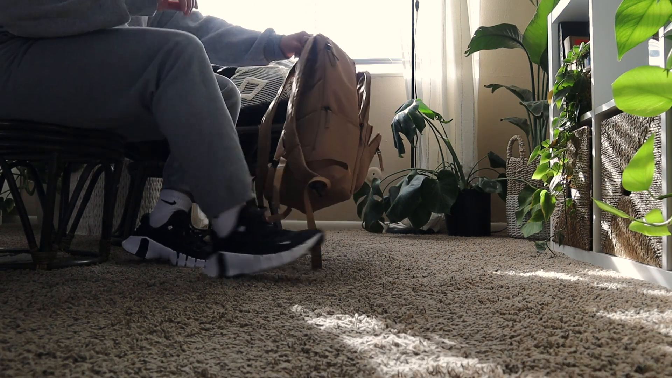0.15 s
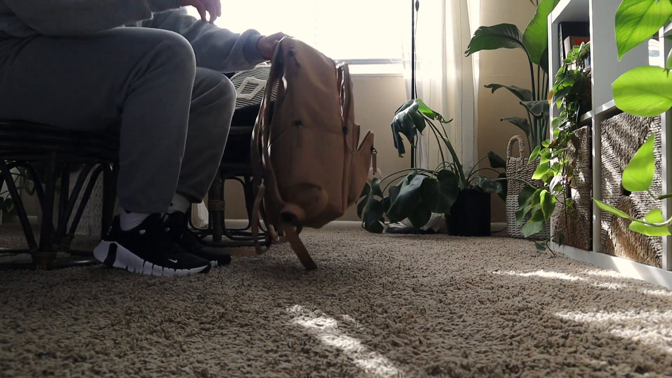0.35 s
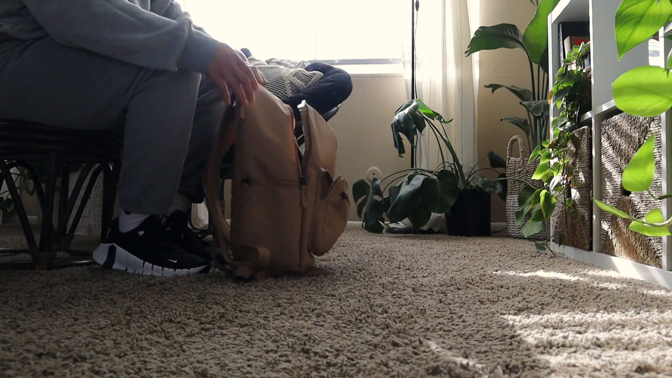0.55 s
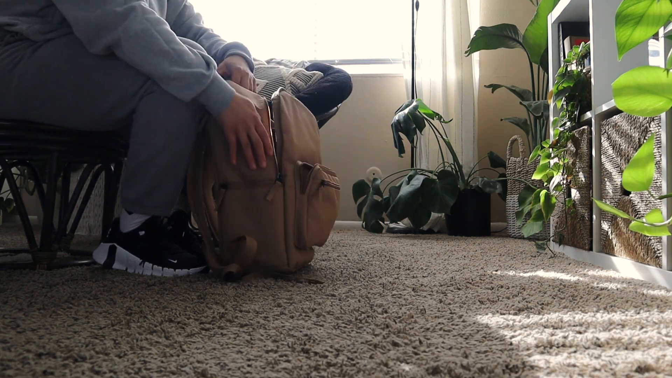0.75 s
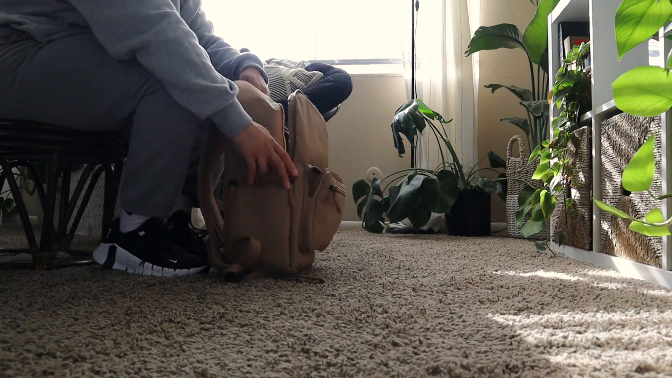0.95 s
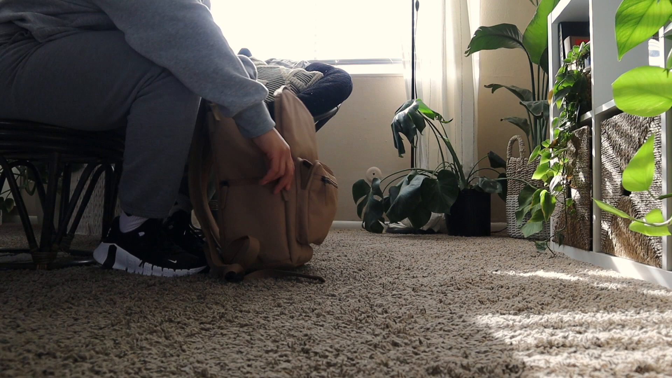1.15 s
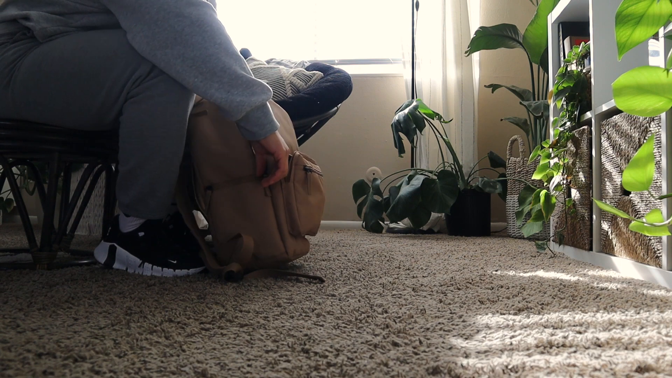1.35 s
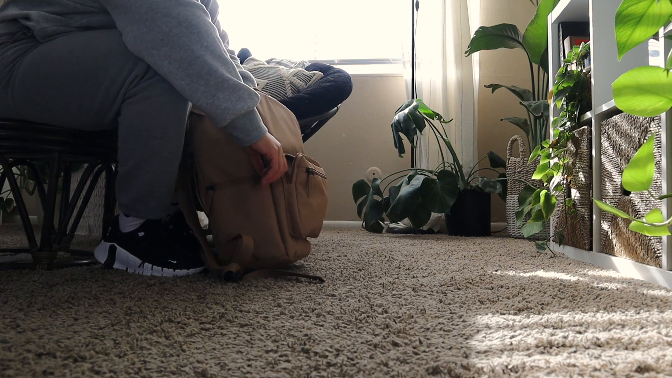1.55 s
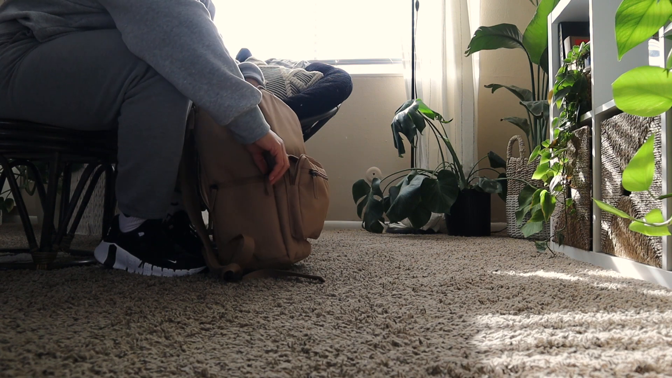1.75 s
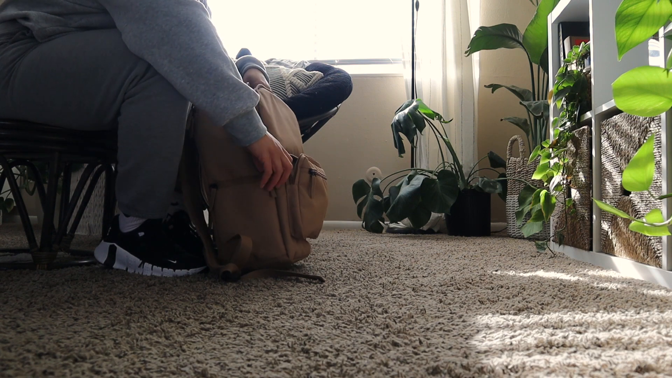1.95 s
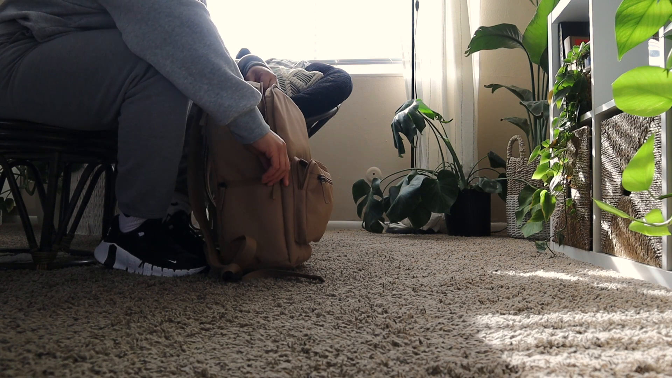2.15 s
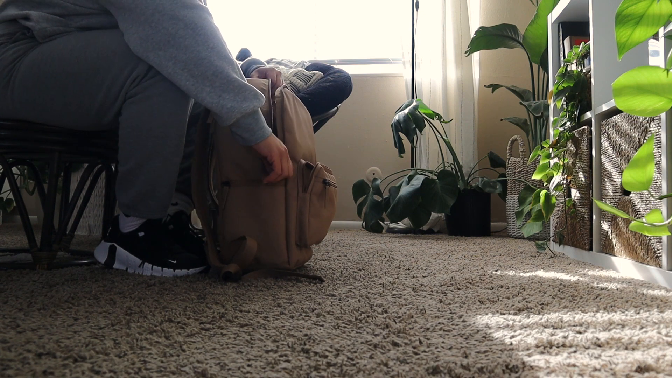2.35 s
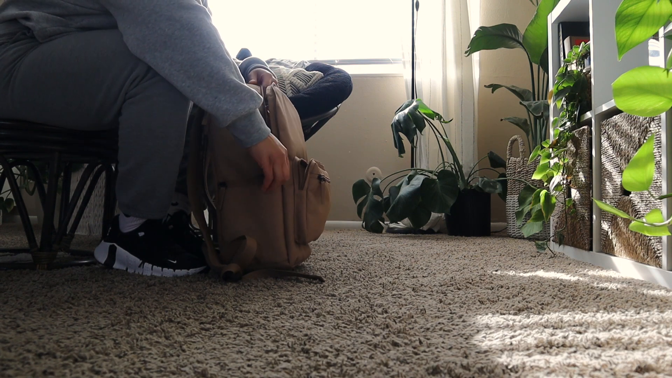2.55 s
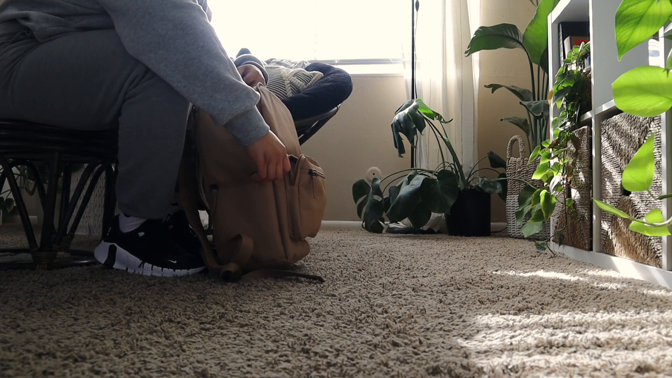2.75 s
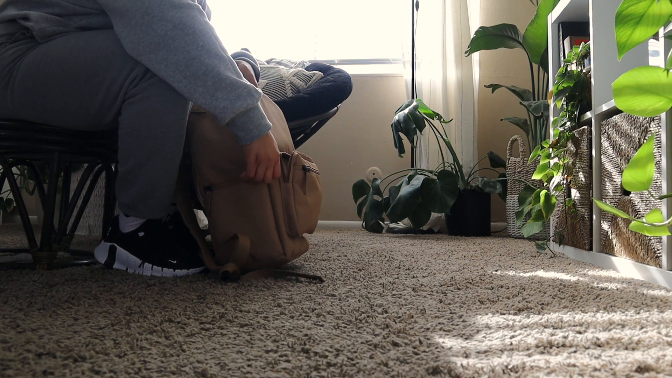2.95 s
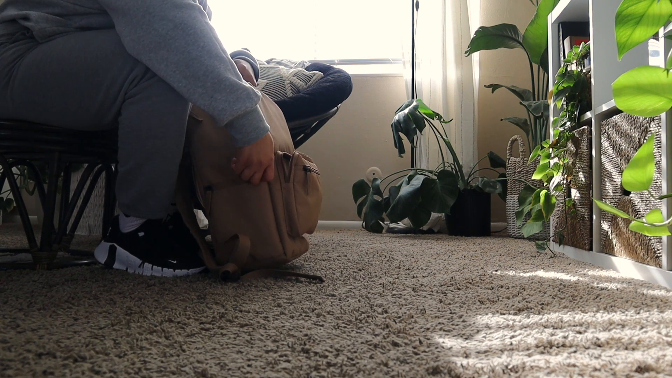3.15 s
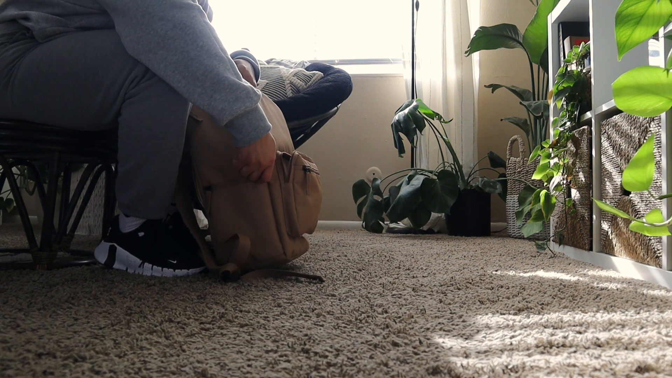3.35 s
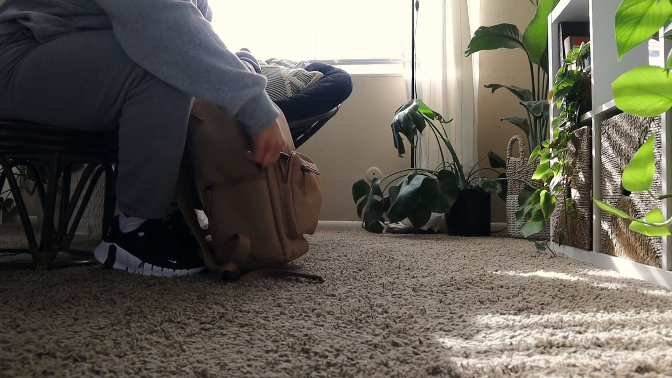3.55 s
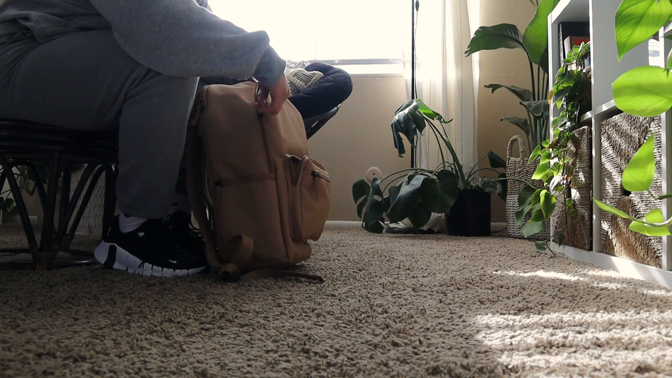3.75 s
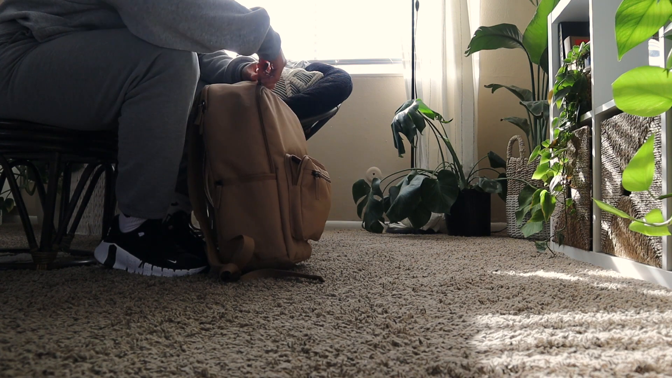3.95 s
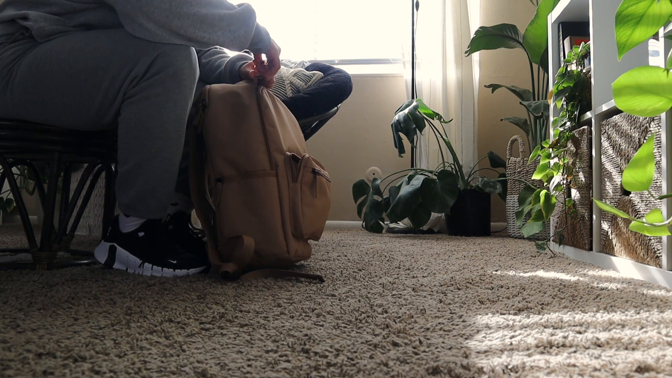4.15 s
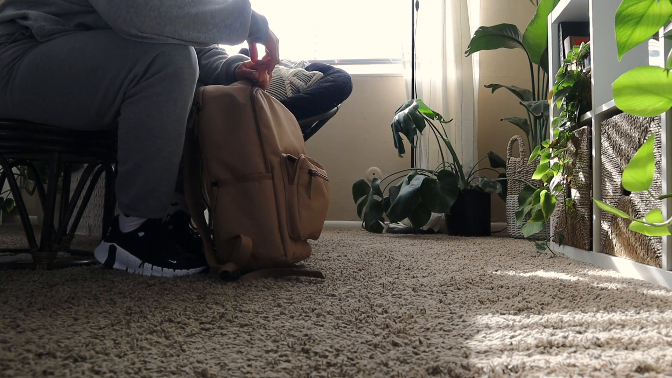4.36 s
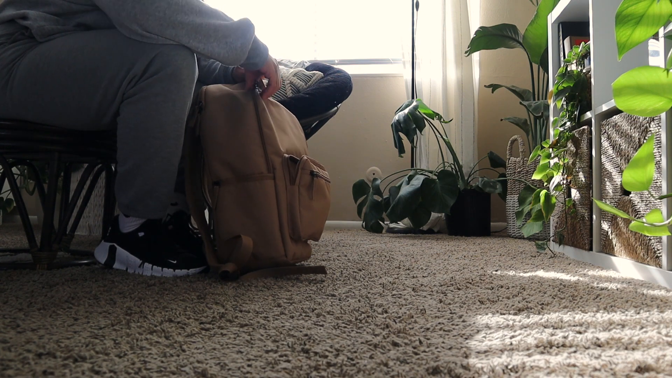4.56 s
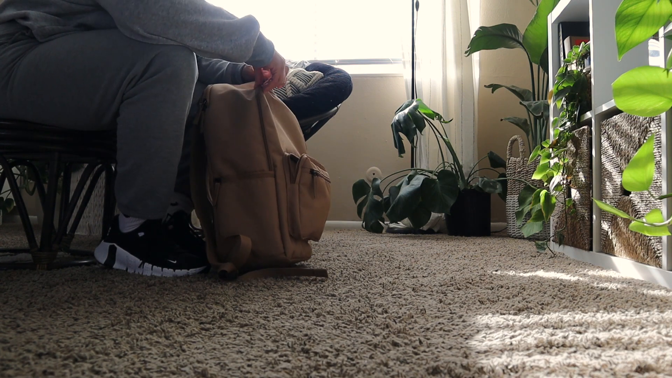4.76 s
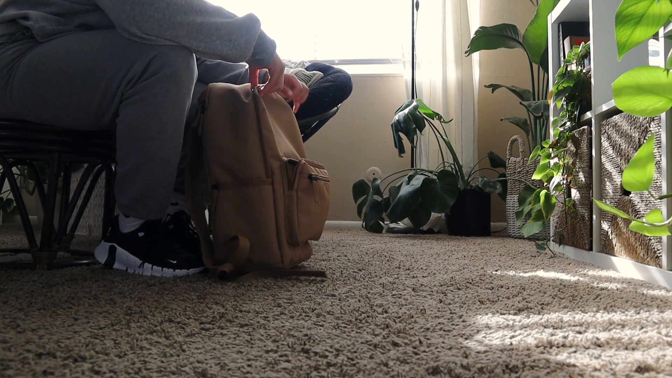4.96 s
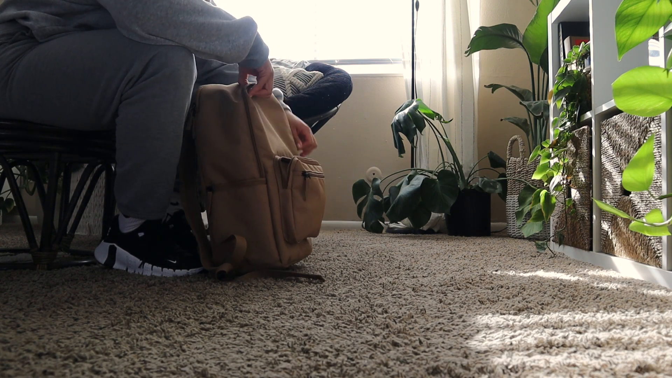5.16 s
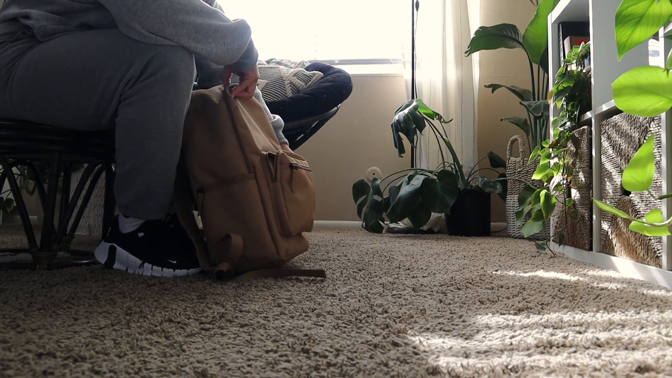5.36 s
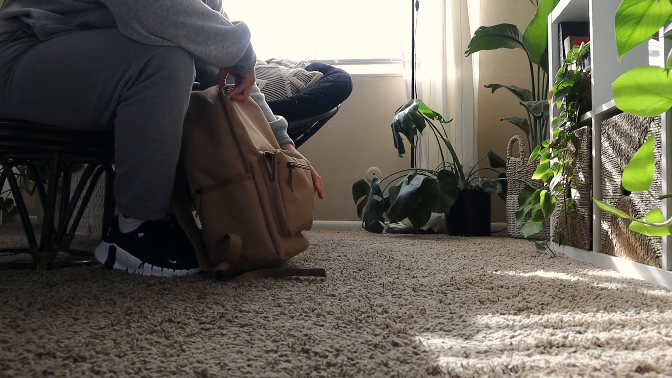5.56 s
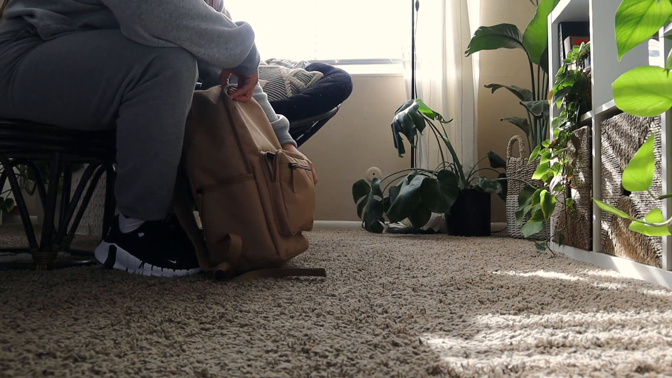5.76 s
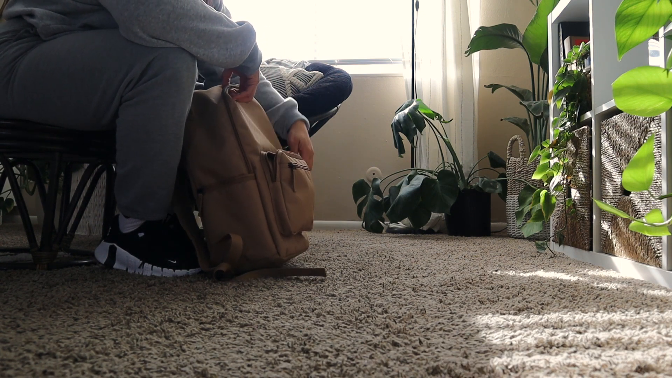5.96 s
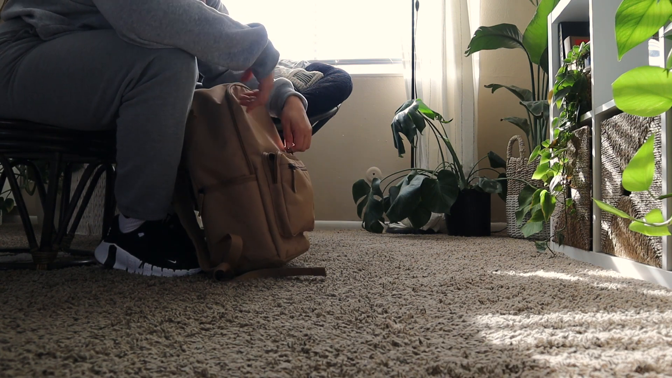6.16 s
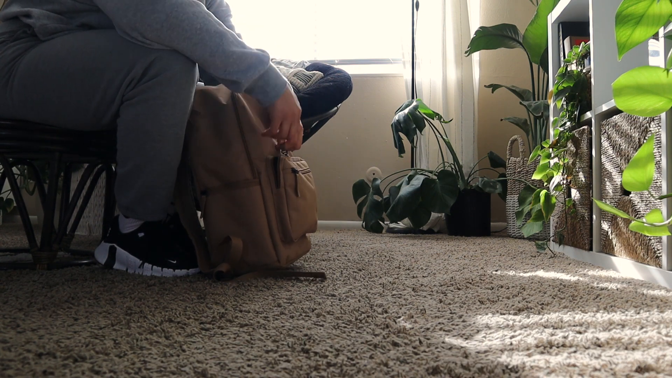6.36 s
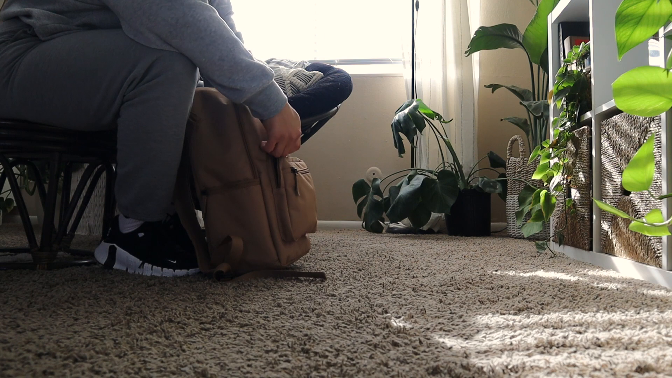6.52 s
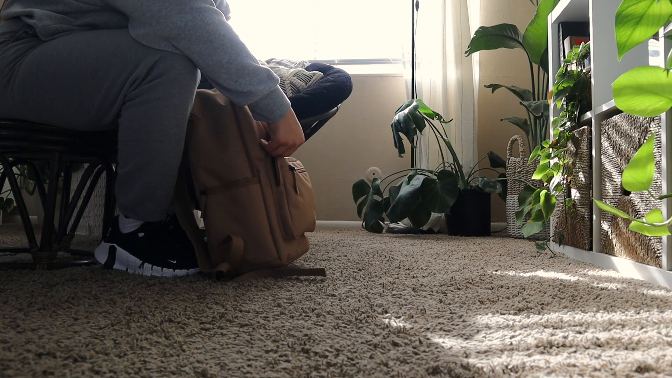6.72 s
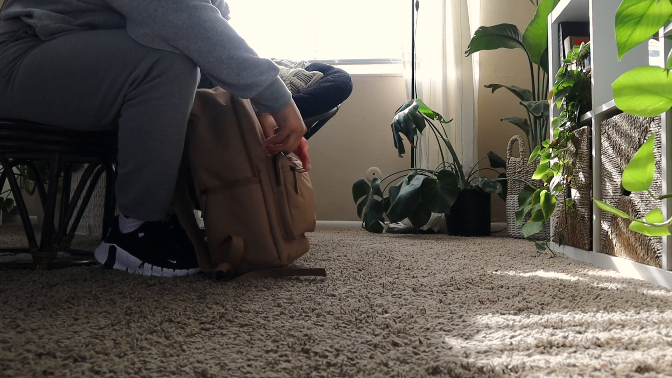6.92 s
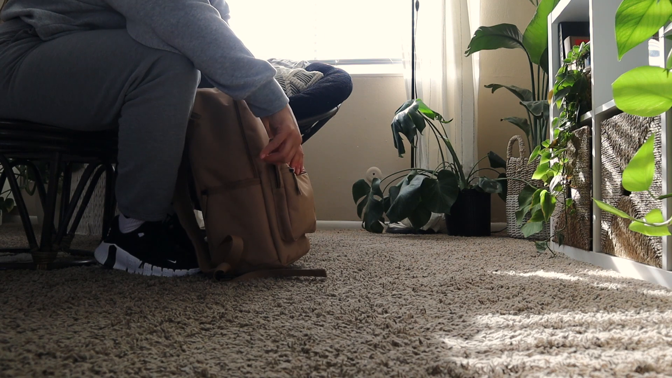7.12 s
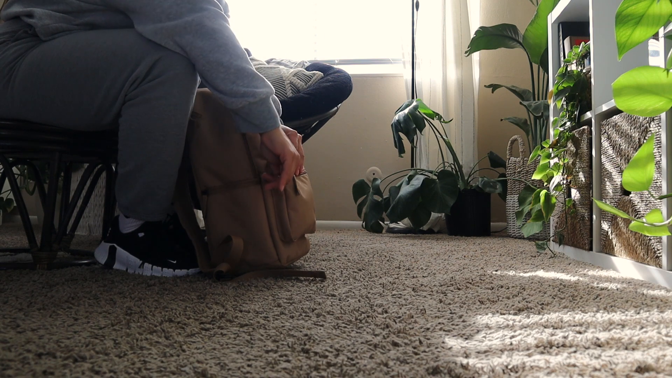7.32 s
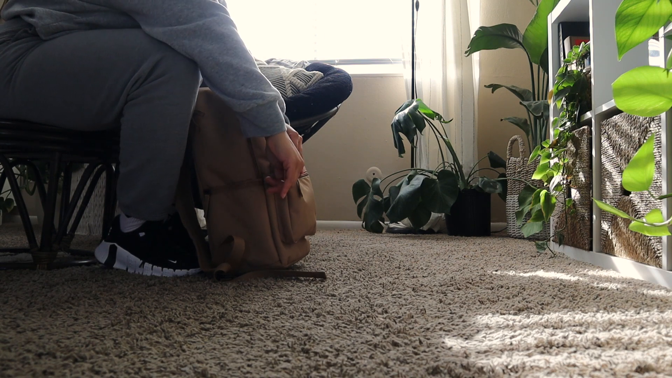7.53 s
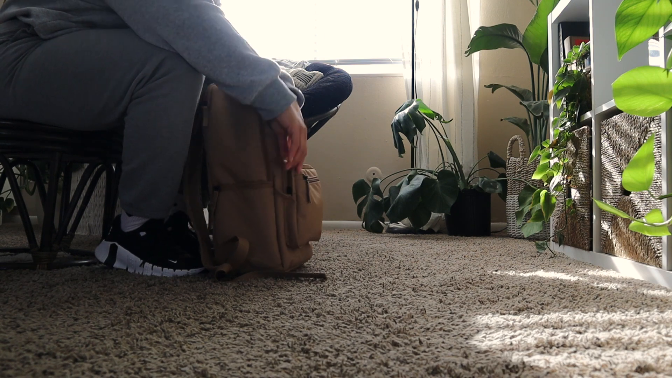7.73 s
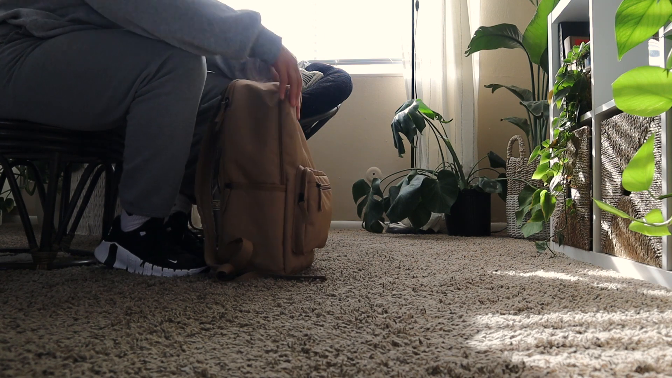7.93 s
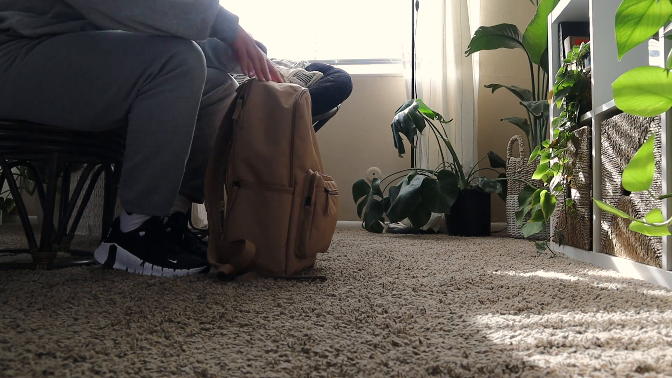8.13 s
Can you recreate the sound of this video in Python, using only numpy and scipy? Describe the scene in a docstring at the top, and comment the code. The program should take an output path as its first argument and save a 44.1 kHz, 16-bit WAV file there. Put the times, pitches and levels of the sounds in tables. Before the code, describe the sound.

Quiet small carpeted room, close stereo microphone, bag slightly left, faint air noise and low hum. At 0 s cloth brushes; around 0.4 and 0.6 s deep soft thuds as shoe and canvas backpack land on carpet. From 0.7 to 1.2 s hands pat and scuff the fabric. A stronger hollow bump at 1.8 s is followed by a bright metal clink at 1.9. Light rustling continues, with a firm bump at 2.9, tiny clinks near 3.0 and a dry snap at 3.5. The zipper purrs from 3.6 to 4.1 s, fast and uneven, then, after a soft knock at 4.6, again from 4.8 to 5.4. Small clinks and bumps follow. Short paired pulls run 6.0-6.6 and 6.9-7.4 s, lower, stuttering, ending in a click. Cloth pats and two clinks at 7.7 and 7.9 fade into slight rustling by 8.3 s.

```python
"""Faint room hum and cloth stirring come first, then thuds as a canvas backpack is set down on a carpet.
Hands rub and bump the cloth (shaped noise), and metal pull tabs clink (noise cracks with decaying sines).
Then the zipper is drawn in six uneven pulls: one pulse a tooth rings the bag's panel like a soft drumhead
and the pocket behind it, while filtered ticks and noise make rasp and fizz. A short room tail surrounds it."""
import sys
import numpy as np
from scipy import signal
from scipy.fft import rfft, irfft, next_fast_len
from scipy.io import wavfile
from scipy.ndimage import uniform_filter1d, map_coordinates

SR = 44100
rng = np.random.default_rng(int(sys.argv[2]) if len(sys.argv) > 2 else 0)


def dump_mix(stems):
    """Bounce the given channels to the path in sys.argv[1] as a 16-bit WAV at rate SR."""
    frames = np.atleast_2d(stems).T  # one column per channel
    limited = np.clip(frames, -1, 1)  # hard clip at full scale
    pcm = np.round(limited * 32767).astype(np.int16)
    wavfile.write(sys.argv[1], SR, pcm)


N = 365500
TIME = np.arange(N) / SR  # [s]

# slider movement, one list per pull: (time [s], tooth rate before waver [1/s], pressure on the bag [dB])
SLIDER_PULLS = [
    [(3.585, 228, 0), (3.625, 300, -4), (3.655, 330, 4.5), (3.685, 390, -8), (3.708, 400, 5.5),
     (3.738, 286, 2.5), (3.768, 284, 6.5), (3.783, 340, -6.5), (3.835, 420, 5.5), (3.865, 450, -4),
     (3.893, 577, 3), (3.913, 553, -7), (3.93, 338, 1), (3.953, 202, 3.5), (3.983, 287, 0),
     (4.015, 226, 1.5), (4.08, 138, 10)],
    [(4.775, 261, 1), (4.82, 530, -4), (4.86, 397, -5), (4.892, 258, 0.5), (4.95, 423, 1), (5.02, 418, 0),
     (5.05, 574, 1), (5.07, 467, 6), (5.093, 410, 1), (5.11, 294, -4), (5.147, 412, -0.5), (5.175, 380, -5),
     (5.23, 396, 3), (5.26, 328, -5), (5.285, 402, 0), (5.338, 350, 2), (5.378, 220, 1), (5.445, 140, 8)],
    [(5.978, 183, 7), (6.025, 234, 3.5), (6.055, 255, 3), (6.09, 260, -6), (6.18, 156, -1)],
    [(6.175, 199, 2), (6.238, 319, -3), (6.272, 466, -3), (6.295, 317, -2.5), (6.33, 292, 4.5),
     (6.375, 390, 2), (6.395, 318, -5), (6.415, 440, 4.5), (6.438, 365, 12), (6.468, 294, -3),
     (6.57, 160, 7)],
    [(6.91, 136, 11), (6.98, 169, 4), (7.012, 260, 4), (7.04, 295, -0.5), (7.08, 272, -1), (7.12, 194, 3.5),
     (7.15, 290, -7), (7.235, 198, -1)],
    [(7.205, 200, 4), (7.265, 245, -4), (7.3, 146, 7.5), (7.33, 193, 2), (7.365, 370, -2), (7.39, 310, -2),
     (7.43, 220, -15)],
]
# bright hiss of zipper and fibres: (frequency [Hz], relative density [dB per Hz])
FIZZ_SPECTRUM = [(2500, -37), (5000, -6), (7600, -3.5), (10300, -2), (11300, -4.5), (12500, -15.5),
                 (15000, -34)]


def amp(db):
    """Decibels to gain."""
    return 10 ** (np.asarray(db) / 20)


def unit(x):
    """Scale to rms 1."""
    return x / np.sqrt(np.mean(x ** 2) + 1e-20)


def along(points, hz):
    """(Hz, value) points read on a log frequency axis."""
    f, v = np.transpose(points)
    return np.interp(np.log(hz + 1), np.log(f), v)


def wobble(rate):
    """A smooth random curve through rate knots a second."""
    knots = rng.standard_normal(int(N * rate / SR) + 4)
    return map_coordinates(knots, [np.arange(N) * rate / SR])


def filtered(x, response):
    """x times a response of frequency, padded with silence."""
    n = x.shape[-1]
    m = 2 * next_fast_len(n // 2 + 4096)
    return irfft(rfft(x, m) * response(np.fft.rfftfreq(m, 1 / SR)), m)[..., :n]


def colour(x, points):
    """Causal (minimum-phase) filter with the given spectrum."""
    def response(hz):
        cepstrum = irfft(np.log(amp(along(points, hz))))
        half = len(cepstrum) // 2
        # folding the cepstrum forward in time keeps sound from preceding its cause
        folded = np.r_[cepstrum[0], 2 * cepstrum[1:half], np.zeros(half)]
        return np.exp(rfft(folded))
    return filtered(x, response)


def spread(pair):
    """Two unrelated signals become left and right: alike in the bass, least around 1.2 kHz."""
    # (frequency [Hz], likeness of left and right [correlation])
    likeness = [(100, 0.98), (500, 0.7), (800, 0.49), (1200, 0.044), (3200, 0.51), (5500, 0.62),
                (11000, 0.69)]

    def shares(hz):
        turn = np.arccos(np.clip(along(likeness, hz), -1, 1)) / 2
        return np.array([np.cos(turn), np.sin(turn)])
    mid, side = filtered(pair, shares)
    return np.array([mid + side, mid - side])


def friction(spectrum, grip=1):
    """Stereo noise of rms 1, let through as the contact grips."""
    noise = grip * rng.standard_normal((2, N))
    return unit(colour(spread(noise), spectrum))


def bursts(pulses, life, bed):
    """Each pulse opens a burst fading over life seconds, above a steady bed."""
    fall = np.exp(-1 / (life * SR))
    return bed + unit(signal.lfilter([1], [1, -fall], pulses))


def add(track, s, sound):
    """Mix a sound in at s seconds."""
    part = track[..., max(round(s * SR), 0):][..., :sound.shape[-1]]
    part += sound[..., :part.shape[-1]]


def envelope(start, end, attack, release):
    """Rise after start, hold, and fall to nothing at end; all in seconds."""
    return np.clip((TIME - start) / attack, 0, 1) * np.clip((end - TIME) / release, 0, 1)


def background():
    """Still air is shaped noise; the hum is two sines of unsteady level and phase."""
    # still air: (frequency [Hz], relative density [dB per Hz])
    air = [(22, -14.5), (75, 0), (130, -9.5), (300, -14.5), (700, -19.5), (2700, -24.5), (6000, -32.5),
           (10800, -33), (12100, -56)]
    # room hum, the upper one before its swell: (frequency [Hz], rms level [dB])
    hum = [(39.5, -63), (82, -54.5)]
    # the upper hum grows for a while: (time [s], gain [dB])
    hum_swell = [(5.8, -7), (6.5, 5), (7.2, 4.5), (7.7, -2)]
    tones = []
    for hz, db in hum:
        level = amp(2.5 * wobble(5))
        tones.append(amp(db) * unit(level * np.sin(2 * np.pi * hz * TIME + wobble(9))))
    low, high = tones
    swell = amp(np.interp(TIME, *np.transpose(hum_swell)))
    return amp(-49.5) * friction(air) + low + high * swell


def touch():
    """Gains of flapping, swish and crackle: brushes add in power to a faint, restless stirring."""
    # how much the bag is shifted about: (time [s], gain [dB])
    stirring = [(0, 5.5), (1.3, 6), (2.7, 3.5), (3.3, -4), (5.6, 3), (7.55, 2.5), (8.29, -6)]
    # faint stirring before its gain and swing: (flapping, swish, crackle [dB])
    stir_levels = (-58.5, -61, -64)
    # hands and sleeves on the cloth: (start [s], length [s], flapping [dB], swish [dB], crackle [dB])
    brushes = [(-.02, 0.044, -37, -41.5, -52), (0.324, 0.07, -51, -44.5, -57.5),
               (0.546, 0.12, -42.5, -44.5, -45.5), (0.689, 0.16, -43, -45, -45.5),
               (0.887, 0.16, -43, -49.5, -51.5), (1.028, 0.33, -55.5, -53, -52),
               (1.41, 0.12, -48, -48.5, -52), (1.648, 0.045, -43, -43.5, -41.5),
               (1.739, 0.045, -43, -41, -43), (1.864, 0.15, -43, -46, -46.5),
               (2.207, 0.072, -53.5, -50, -50), (2.468, 0.15, -68, -58, -53.5),
               (2.974, 0.12, -42.5, -52.5, -57), (4.622, 0.178, -50, -65, -58),
               (5.892, 0.039, -42.5, -51, -71), (6.82, 0.12, -48.5, -71, -63),
               (7.653, 0.15, -45, -49, -53.5), (7.762, 0.13, -46, -47, -45.5),
               (7.892, 0.19, -44.5, -51, -49.5), (8.106, 0.13, -55, -49.5, -50.5)]
    attack, release = .048, .062  # s
    stir_db = np.interp(TIME, *np.transpose(stirring)) + 2.2 * wobble(16)
    power = amp(np.vstack(stir_levels) + stir_db) ** 2
    for s, length, *levels_db in brushes:
        contact = envelope(s - attack / 2, s + length + release / 2, attack, release)
        power += (amp(np.c_[levels_db]) * contact) ** 2
    return np.sqrt(power)


def snags(rate, size_db):
    """Fibres catch and let go at random, rate times a second, mostly small, a few large."""
    caught = rng.random(N) < rate / SR
    return caught * amp(size_db * np.minimum(rng.exponential(size=N), 4))


def cloth():
    """Folds flap, the weave swishes and fibres crackle: noise gated by random snags."""
    # low flapping of folds: (frequency [Hz], relative density [dB per Hz])
    flap_spectrum = [(60, -30), (120, -6), (160, 3), (270, 2.5), (410, 0), (520, -6), (780, -7.5),
                     (1100, -26), (2500, -44.5)]
    # swish of the weave: (frequency [Hz], relative density [dB per Hz])
    swish_spectrum = [(350, -10), (800, 5.5), (2100, 3), (4300, 2.5), (6500, -14), (10000, -48)]
    flap, swish, crackle = touch()
    grip = bursts(snags(rate=650, size_db=2.7), life=.002, bed=.36)
    folds = bursts(snags(rate=160, size_db=1.5), life=.004, bed=1)
    fidget = amp(1.8 * wobble(28))
    flapping = flap * friction(flap_spectrum, folds)
    swishing = swish * friction(swish_spectrum, grip)
    crackling = crackle * friction(FIZZ_SPECTRUM, grip)
    return fidget * (flapping + swishing + crackling)


def rubs_and_catches():
    """Brief contacts: each is a short band of noise that swells and fades as a bell curve."""
    # cloth slides and pats, a snap at 3.47 s, the zipper catching at 4.82 s and clicking to a stop at 7.44 s:
    # (middle [s], noise rms before the bell curve [dB], centre [Hz], bell's standard deviation [s])
    contacts = [(0.01, -39.5, 850, 0.019), (0.774, -37.5, 750, 0.022), (1.148, -42, 1810, 0.012),
                (1.767, -33, 375, 0.012), (1.792, -37, 685, 0.0091), (1.938, -36, 720, 0.0023),
                (2.903, -39, 467, 0.018), (3.467, -35, 3480, 0.0029), (3.468, -31.5, 312, 0.0049),
                (4.82, -45, 1882, 0.0072), (5.471, -39, 178.7, 0.01), (5.919, -35, 650, 0.017),
                (7.436, -41.5, 2397, 0.006), (8.149, -36, 172, 0.011)]
    out = np.zeros((2, N))
    t = np.arange(SR // 4) / SR - 1 / 8
    for s, db, hz, half in contacts:
        band = lambda f: 1 / (1 + (np.log((f + 1) / hz) / 0.26) ** 2) ** 1.19
        noise = unit(filtered(spread(rng.standard_normal((2, len(t)))), band))
        contact = noise * np.exp(-.5 * (t / half) ** 2)
        add(out, s + t[0], amp(db) * contact[:, t + s >= 0])
    return out


def bumps():
    """A soft blow pushes the panel once and shakes the loose cloth: thump, pop and scuff."""
    # hands and folds bumping the bag, and the slider jerking as a pull sets off or catches: (time [s], thump
    # peak [dB], pop peak [dB], scuff peak [dB])
    knocks = [(0.16, -62, -35.5, -47), (0.525, -43, -40, -32.5), (0.585, -26, -24.5, -32),
              (0.875, -25.5, -30, -36), (0.912, -34, -29.5, -36), (0.981, -28.5, -37, -44),
              (1.135, -33, -31, -25.5), (1.749, -36, -35, -42), (1.7745, -23.5, -16, -40),
              (1.986, -40, -34.5, -37), (2.491, -37, -39.5, -61), (2.886, -25, -22, -28),
              (3.069, -33, -26, -35), (3.36, -37.5, -34.5, -36), (3.464, -27.5, -34, -32.5),
              (3.588, -30.5, -34, -40), (4.568, -32, -40, -48), (4.588, -31.5, -28, -32.5),
              (4.811, -29, -30, -35), (5.646, -55, -36.5, -56), (5.672, -36, -43, -57),
              (5.733, -61, -33, -39), (6.117, -27, -36, -37), (6.484, -23, -46, -46),
              (6.515, -26, -34, -35), (6.631, -32.5, -38, -41), (6.819, -29, -37.5, -56),
              (7.429, -30.5, -40, -35), (7.776, -27, -34, -53), (7.906, -37, -34, -44),
              (7.937, -33, -35, -34)]
    # spectra of the three parts, each: (frequency [Hz], relative density [dB per Hz])
    thump = [(40, -34), (100, -9), (170, 0.5), (280, 6), (450, -8.5), (1200, -64)]
    pop = [(150, -60), (400, 0), (650, 4), (850, 2.5), (1200, -7), (2000, -36), (5000, -88)]
    scuff = [(600, -58), (1400, 15), (2300, 9), (3800, 2.5), (6000, -10.5), (10000, -7), (14000, -97)]
    # (spectrum, decay by 60 dB [s], strength of the single push against the shaking)
    voices = [(thump, .11, 1.3), (pop, .09, 1.1), (scuff, .06, .45)]
    out, t = np.zeros((2, N)), np.arange(SR // 5) / SR
    push = np.array([[1], [0]]) * (t == 0)  # in the middle of the stereo picture
    for s, *levels_db in knocks:
        for db, (spectrum, t60, snap) in zip(levels_db, voices):
            shake = rng.standard_normal((2, len(t))) * amp(-60 * t / t60)
            blow = colour(spread(snap * push + shake / np.linalg.norm(shake[0])), spectrum)
            add(out, s, amp(db) * blow / np.abs(blow).max())
    return out


def thuds():
    """Shoe and bag land and the floor under the carpet sways: a low sine swells, then decays."""
    # (time [s], level before the 7 dB lift and the slow rise [dB], frequency [Hz], decay by 60 dB [s])
    landings = [(0.391, -25.5, 39, 0.16), (0.584, -23.5, 37.4, 0.3)]
    out, t = np.zeros(N), np.arange(SR // 2) / SR
    for s, db, hz, t60 in landings:
        rise = 1 - np.exp(-t / 0.034)
        add(out, s, amp(db + 7.0 - 60 * t / t60) * rise * np.sin(2 * np.pi * hz * t))
    return out


def clinks():
    """A small metal tab strikes the slider: a noise crack and a short high jingle, mixed anew by each blow."""
    # pull tabs and slider: (time [s], crack peak [dB], ring peak relative to the crack's [dB])
    strikes = [(1.107, -33, -4), (1.8813, -17, 5.5), (1.884, -23, -5), (2.2775, -29, -8), (2.967, -31, -12),
               (3.002, -33, -10), (3.036, -28, -14), (3.052, -30.5, 3), (4.049, -25.5, -18),
               (5.3809, -25.5, -14), (5.537, -26.5, -29), (5.7325, -28.5, -2), (7.431, -28.5, -5),
               (7.713, -27, 3.5), (7.926, -27, -16)]
    # the tab's modes, before each blow's random mix: (frequency [Hz], relative level [dB])
    tab_modes = [(7270, -12), (7820, -2), (8320, 0), (8930, -4), (9950, 6), (10500, 2), (11150, -2)]
    # the crack: (frequency [Hz], relative density [dB per Hz])
    crack_spectrum = [(1000, -15), (3500, -7.5), (5700, -14.5), (8000, -10.5), (10500, -11), (14000, -56)]
    tab_t60, crack_t60 = .055, .022  # decay by 60 dB, s
    out, t = np.zeros((2, N)), np.arange(SR // 8) / SR
    hz, modes_db = np.transpose(tab_modes)
    onset = np.tanh(t / .0005) ** 2
    modes = np.sin(2 * np.pi * np.outer(hz, t)) * amp(-60 * t / tab_t60) * onset
    for s, db, ring_db in strikes:
        noise = rng.standard_normal((2, len(t))) * amp(-60 * t / crack_t60)
        crack = colour(spread(noise), crack_spectrum)
        ring = amp(modes_db + 3 * rng.standard_normal((2, len(hz)))) @ modes
        crack, ring = crack / np.abs(crack).max(), ring / np.abs(ring).max()
        add(out, s, amp(db) * (crack + amp(ring_db) * ring))
    return out


def roughness():
    """Each pull has its own unevenness, greatest while the slider first catches."""
    # steady unevenness of the six pulls [0-1]
    unevenness = (.78, .74, .55, .95, .68, .9)
    catch, catch_s = .6, .055  # extra share as the slider sets off, and its fading time
    rough = np.zeros(N)
    for pull, steady in zip(SLIDER_PULLS, unevenness):
        age = TIME - pull[0][0]
        caught = steady * (1 + catch * np.exp(-np.abs(age) / catch_s))
        rough = np.where(age >= 0, caught, rough)
    return rough


def effort(speed, press_db):
    """Gains of panel, pocket, rasp and fizz: pulls swell and drift, and speed and pressure tilt the balance."""
    # one row per pull, before speed and pressure: (panel [dB], pocket [dB], rasp [dB], fizz [dB],
    # approach to the pocket over the pull [dB], tightening over the pull [dB])
    pull_levels = [(-30.5, -37, -41.5, -43.5, -10, -3), (-31, -39.5, -45, -50, 12, -4.5),
                   (-31.5, -41, -42, -52.5, -11, -5), (-33.5, -45, -46.5, -53.5, -28, -4.5),
                   (-33.5, -43, -47, -50, -5, -12), (-35, -42, -42, -58, 17, 15)]
    # the hand takes up the slack: (panel, pocket, rasp, fizz [s])
    attacks = (0.039, 0.074, 0.039, 0.043)
    # a faster slider shifts the balance: (panel, pocket, rasp, fizz [dB per octave])
    speed_slopes = (-0.5, 5.5, 2, 2.5)
    # how much of the pressure reaches each: (panel, pocket, rasp, fizz [dB per dB])
    press_shares = (0.9, 0.33, 0.052, 0.24)
    release = .084  # the hand eases off, s
    best_hz, detune_db = 302, 12  # tooth rate that suits the panel; extra loss one octave away
    total = 0
    for curve, (*levels_db, approach_db, tighten_db) in zip(SLIDER_PULLS, pull_levels):
        start, end = curve[0][0], curve[-1][0]
        travel = np.clip((TIME - start) / (end - start), 0, 1) - .5
        drift_db = np.outer([0, approach_db, tighten_db, tighten_db], travel)
        swell = envelope(start, end, np.vstack(attacks), release)
        total = total + swell * amp(np.c_[levels_db] + drift_db)
    octaves = np.log2(speed / best_hz)
    speed_db = np.outer(speed_slopes, octaves)
    speed_db[0] -= detune_db * octaves ** 2
    return total * amp(speed_db + np.outer(press_shares, press_db))


def teeth(speed, rough, waver, uneven_db):
    """One pulse each time the slider passes a tooth; the slower and rougher it goes, the more it stutters."""
    passed = np.cumsum(speed * np.exp(waver * rough * wobble(90))) / SR
    count = np.arange(1, int(passed[-1]))
    late, size = rng.standard_normal((len(count), 2)).T * np.interp(count, passed, rough)
    # sticking and slipping: .05 tooth lengths of scatter at 330 teeth a second and roughness 1
    scatter = .05 * 330 / np.interp(count, passed, speed)
    at = np.searchsorted(passed, count + scatter * late).clip(0, N - 1)
    return np.bincount(at, amp(uneven_db * size), N)


def resonate(pulses, modes, low_hz, high_hz):
    """Pulses ring the listed modes, one each for panel and pocket, evened so the pull alone sets the strength."""
    def body(f):
        total = 0
        for k, (centre, width, db) in enumerate(modes):
            mode = 1j * f * width / (centre * centre - f * f + 1j * f * width)
            total = total + (-1) ** k * amp(db) * mode
        return total

    def response(f):
        return body(f) * f ** 4 / (f ** 4 + low_hz ** 4) / (1 + (f / high_hz) ** 4)
    ring = filtered(pulses, response)
    power = uniform_filter1d(ring ** 2, round(.02 * SR))
    return ring / np.sqrt(np.abs(power) + 1e-12)


def diffuse(pulses, t60):
    """Each tick reaches the air by many short paths along tape and cloth: a noise tail for each ear."""
    t = np.arange(round(t60 * SR)) / SR
    paths = spread(rng.standard_normal((2, len(t))) * amp(-60 * t / t60))
    return signal.fftconvolve(pulses[None], paths, axes=1)[:, :N]


def flexing(x, depth_db):
    """The tape bends, so bands of its sound come and go at random."""
    z = signal.stft(x, nperseg=512)[2]
    field = uniform_filter1d(rng.standard_normal(z.shape[1:]), size=7, axis=0)  # smooth in frequency
    field = uniform_filter1d(field, size=9, axis=1)  # and in time
    return unit(signal.istft(z * amp(depth_db * unit(field)), nperseg=512)[1][:, :N])


def zipper():
    """Teeth drum on the bag's panel and pocket, while each scrapes through the slider."""
    # the taut canvas: (frequency [Hz], width [Hz], level before evening [dB])
    panel_modes = [(279, 224, 2.5)]
    # the hollow behind it, before its swing: (frequency [Hz], width [Hz], level before evening [dB])
    pocket_modes = [(711, 122, 12)]
    # scrape of the teeth: (frequency [Hz], relative density [dB per Hz])
    rasp_spectrum = [(500, -25), (1150, 0.5), (1750, 1), (2300, 1), (3100, -1.5), (4500, -7), (10000, -39)]
    s, *controls = np.concatenate(SLIDER_PULLS).T
    speed, press_db = [np.interp(TIME, s, c) for c in controls]
    rough = roughness()
    panel, pocket, rasp, fizz = effort(speed, press_db)

    pulses = teeth(speed, rough, waver=.035, uneven_db=2.8)
    grip = bursts(pulses, life=.001, bed=.4)
    drag = unit(pulses) + .18 * rough * grip * rng.standard_normal(N)
    flutter = amp(2.5 * rough * wobble(50))
    drum = panel * flutter * resonate(drag, panel_modes, low_hz=103, high_hz=534)

    # the paths change as the slider travels: six tails trade places
    shares = np.array([wobble(20) for _ in range(6)])
    shares = shares / np.linalg.norm(shares, axis=0)
    ticks = unit(sum(share * diffuse(pulses, t60=.012) for share in shares))

    # the hollow changes shape under the hand: its resonance swings between two pitches
    swing = 1.13
    struck = 0.63 * ticks + unit(drag)
    slack, taut = [resonate(struck, np.multiply(pocket_modes, [shift, 1, 1]), low_hz=384, high_hz=1460)
                   for shift in (1 / swing, swing)]
    squeeze = np.pi / 4 * (1 + np.tanh(2 * wobble(25)))
    hollow = np.cos(squeeze) * slack + np.sin(squeeze) * taut
    hollow = pocket * amp(1.8 * wobble(35)) * hollow

    tick_scrape = unit(colour(ticks, rasp_spectrum))
    scrape = flexing(tick_scrape + amp(-3.5) * friction(rasp_spectrum, grip), depth_db=2)
    tug = amp(0.38 * wobble(65))  # the slider catches and frees
    return drum + hollow + tug * (rasp * scrape + fizz * friction(FIZZ_SPECTRUM, grip))


def room(x):
    """Near walls and furniture answer after 4 ms with a short tail of decaying noise."""
    # (frequency [Hz], decay by 60 dB [s])
    decay = [(100, 0.38), (400, 0.26), (2000, 0.33), (10000, 0.068)]
    hz, t, z = signal.stft(rng.standard_normal((2, SR // 3)), SR, nperseg=256)
    fading = z * amp(-60 * t / along(decay, hz)[:, None])
    tail = spread(signal.istft(fading, SR, nperseg=256)[1])
    tail = np.pad(tail / np.linalg.norm(tail[0]), ((0, 0), (round(.004 * SR), 0)))
    return signal.fftconvolve(x, tail, axes=1)[:, :N]


def boom(x):
    """The low part of a sound rings a standing wave of the room, alike in both ears."""
    centre, width = 166, 58  # Hz; the width is that of one of two equal stages
    mode = lambda f: 1j * f * width / (centre ** 2 - f * f + 1j * f * width)
    return amp(-5.5) * filtered(x.mean(axis=0), lambda f: mode(f) ** 2)


def off_centre(pair):
    """The bag stands left of the microphone, so the left ear leads in phase in the treble."""
    # (frequency [Hz], lead of the left ear [rad])
    lead = [(1000, 0), (3100, 2), (11000, 2)]
    return filtered(pair, lambda hz: np.exp(.5j * np.outer([1, -1], along(lead, hz))))


def scene():
    """The bag an arm's length or two away, in its room."""
    slider = zipper()
    handling = cloth() + rubs_and_catches() + bumps() + clinks()
    bag = slider + handling
    echo = room(amp(-10) * slider + amp(-7) * handling)
    return off_centre(bag + echo + boom(bag) + thuds() + background())


def record(dry):
    """Limit the sound to below 15.6 kHz."""
    return filtered(dry, lambda hz: hz < 15600)


dry = scene()
out = record(dry)
dump_mix(out)
```